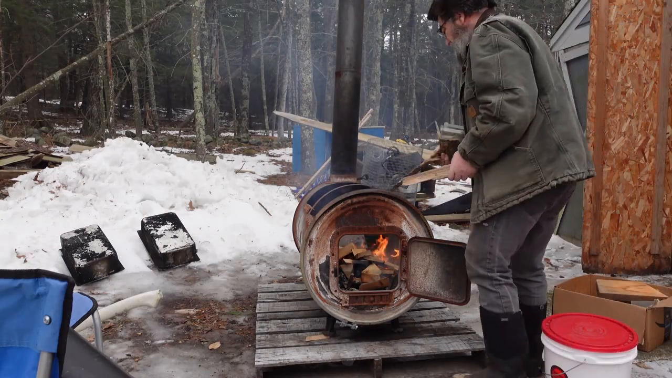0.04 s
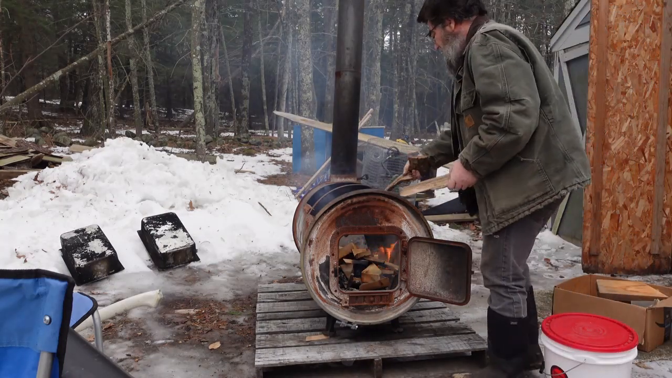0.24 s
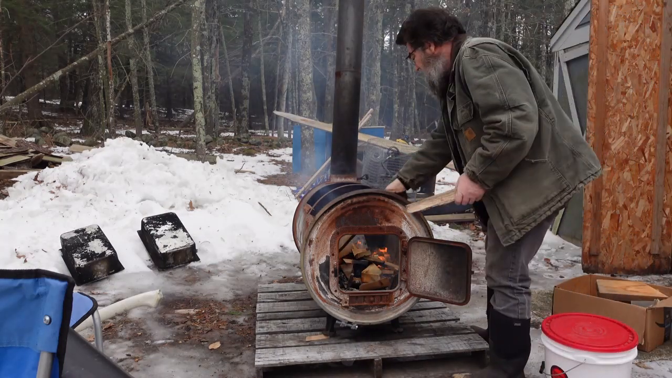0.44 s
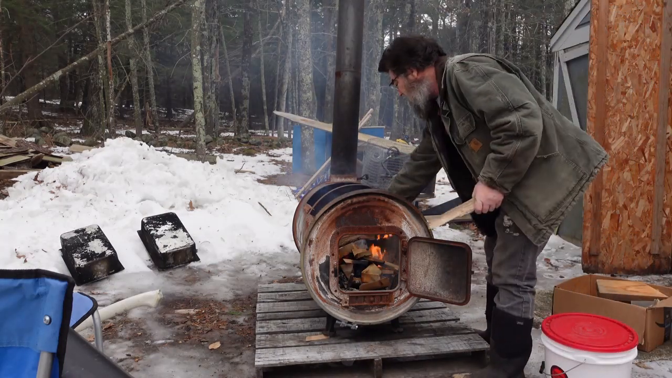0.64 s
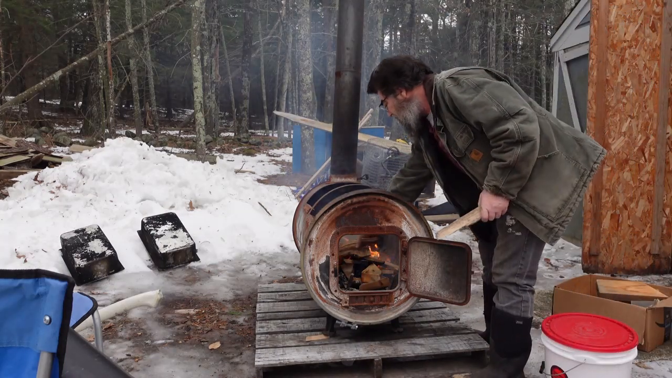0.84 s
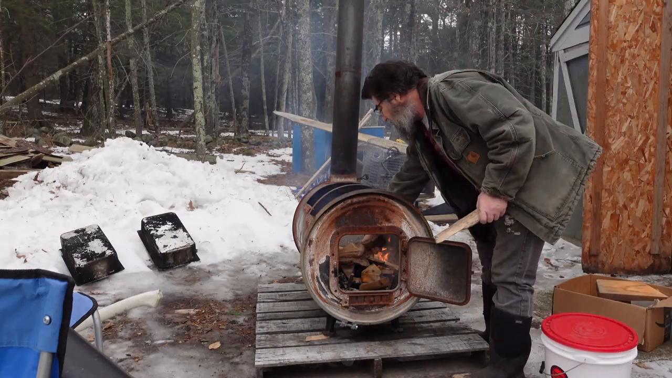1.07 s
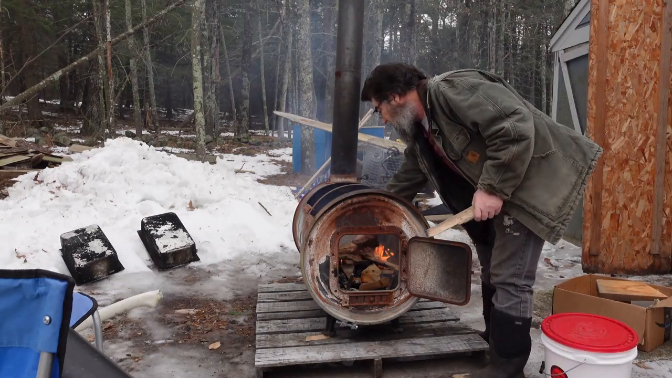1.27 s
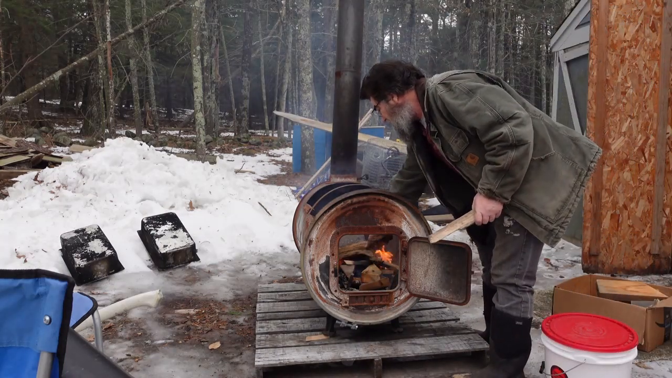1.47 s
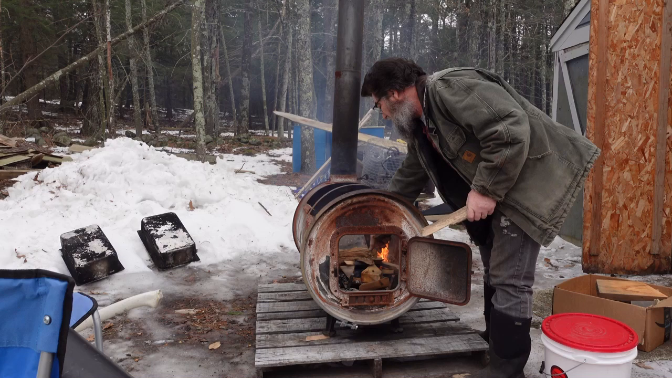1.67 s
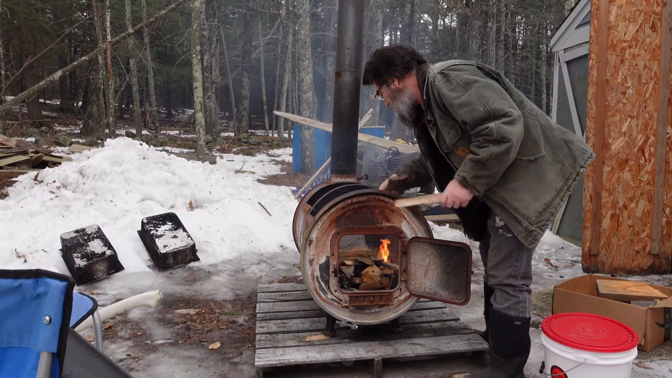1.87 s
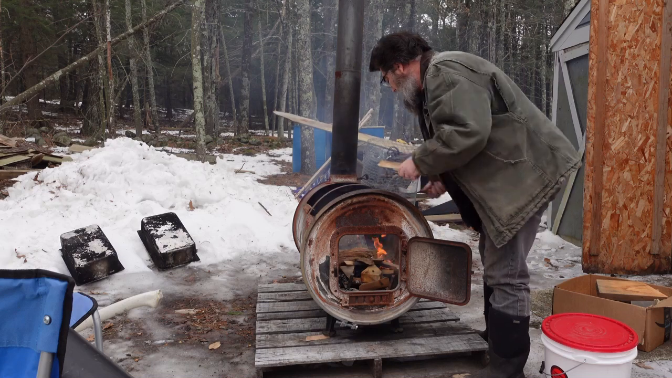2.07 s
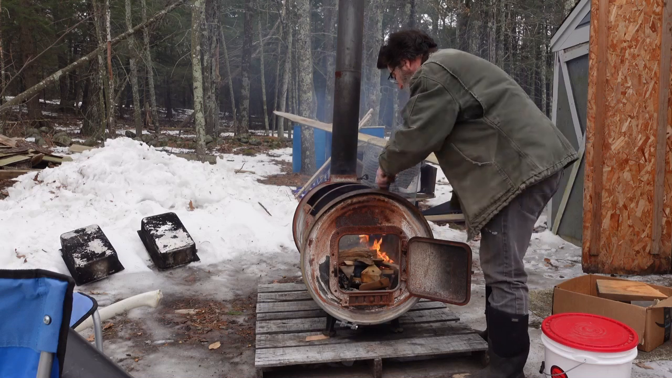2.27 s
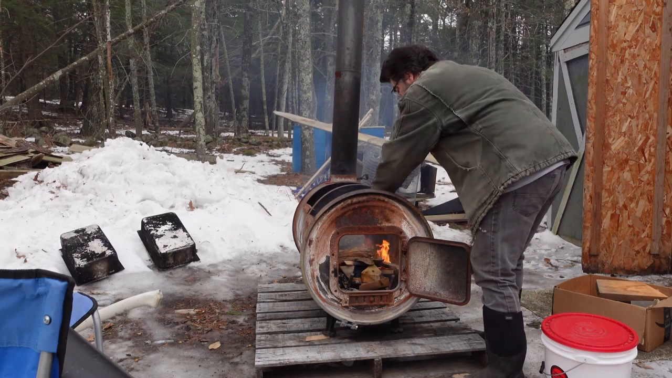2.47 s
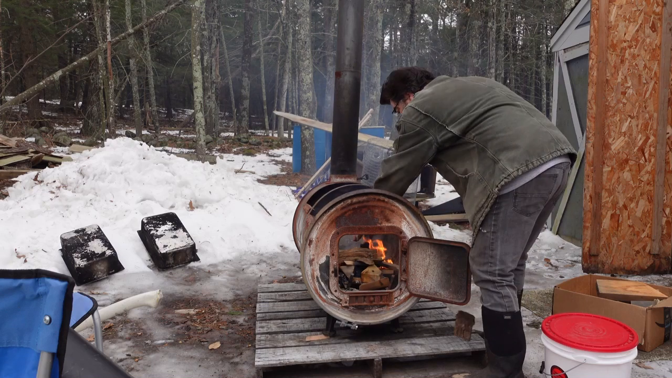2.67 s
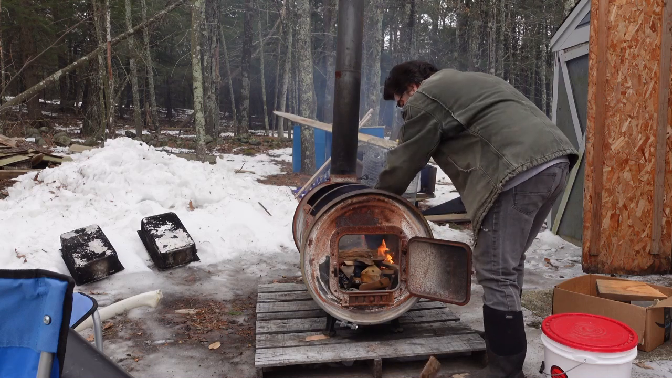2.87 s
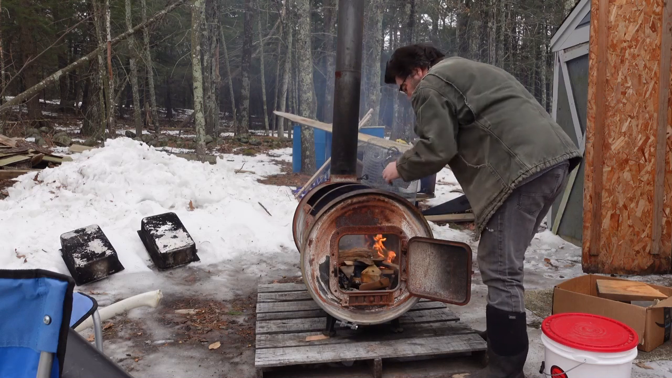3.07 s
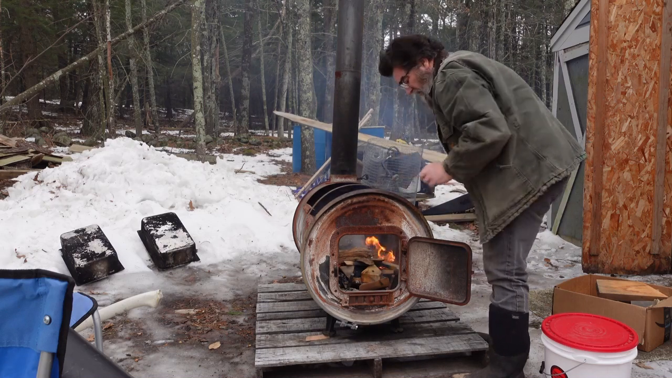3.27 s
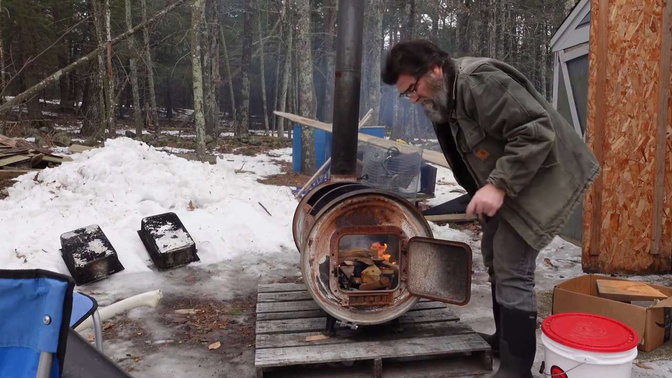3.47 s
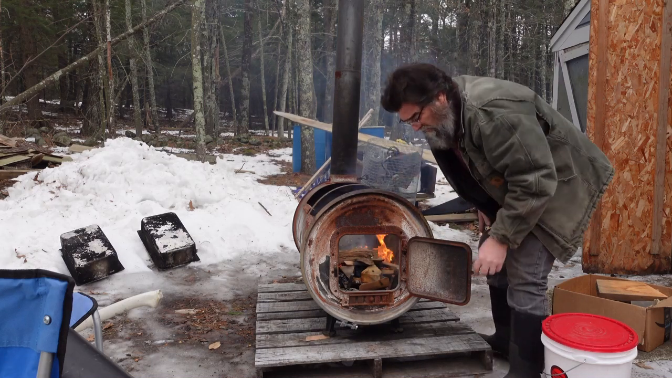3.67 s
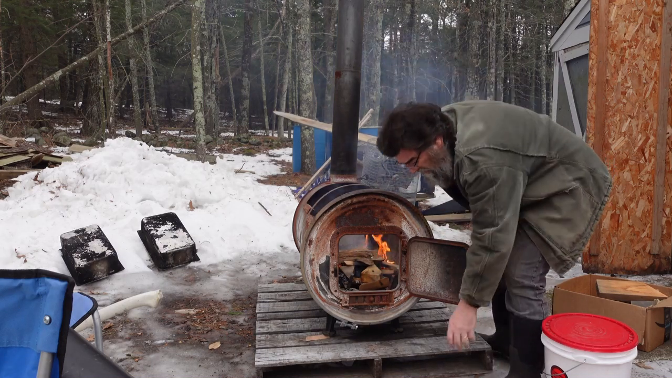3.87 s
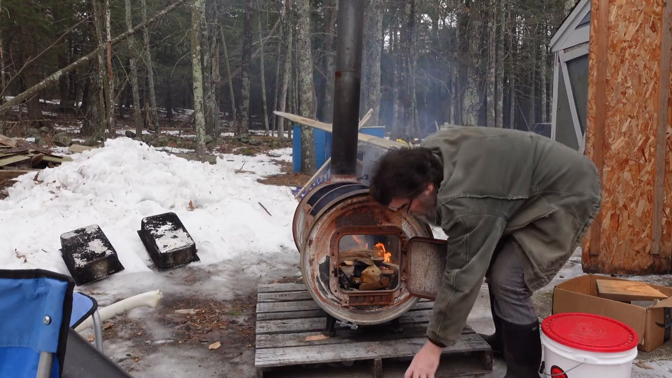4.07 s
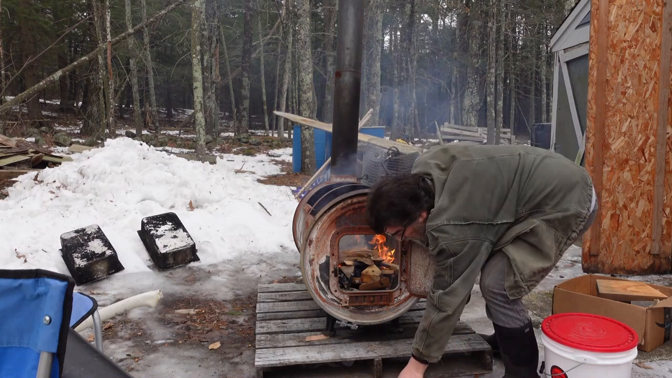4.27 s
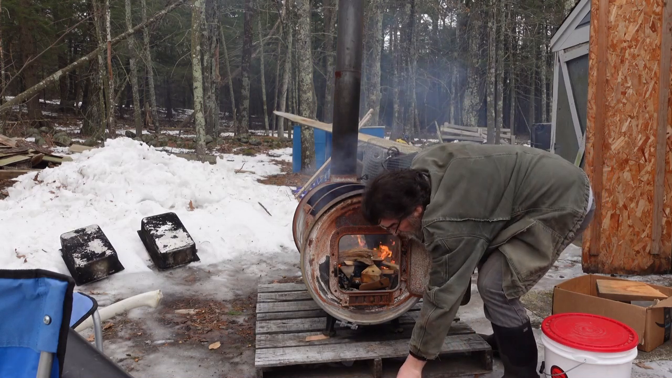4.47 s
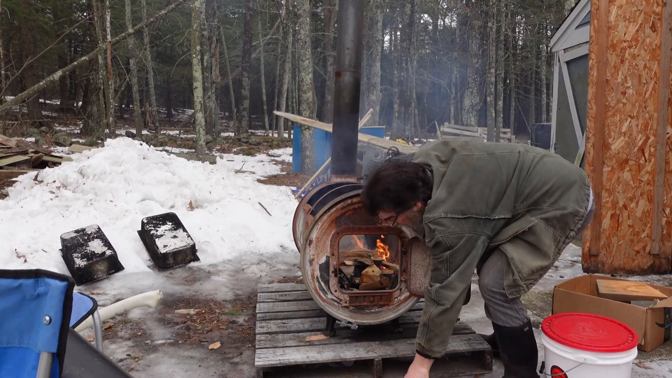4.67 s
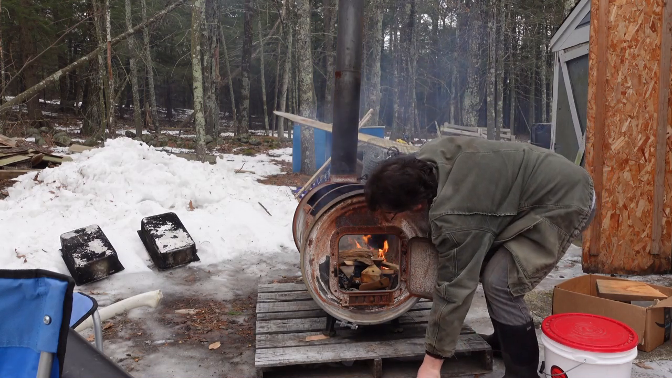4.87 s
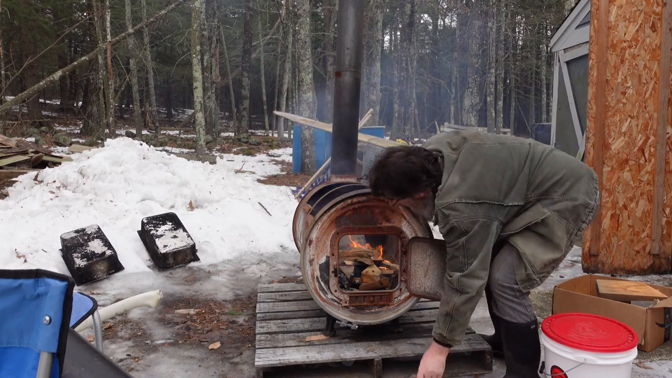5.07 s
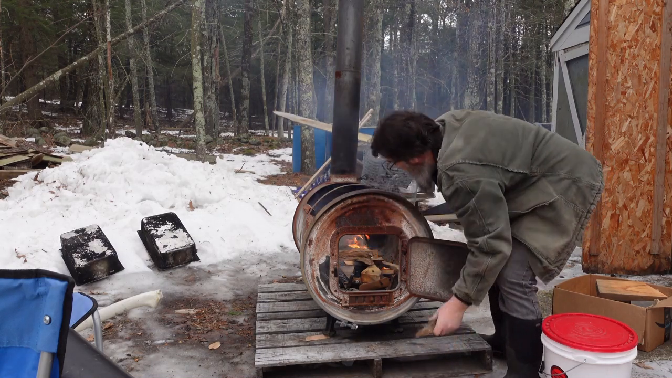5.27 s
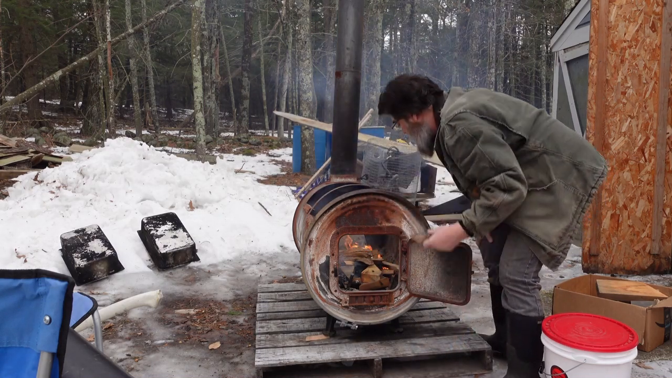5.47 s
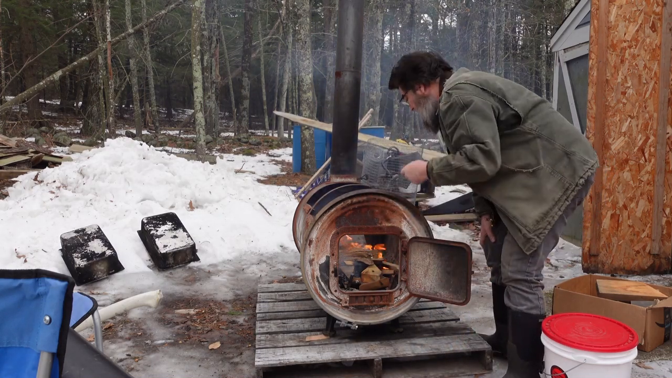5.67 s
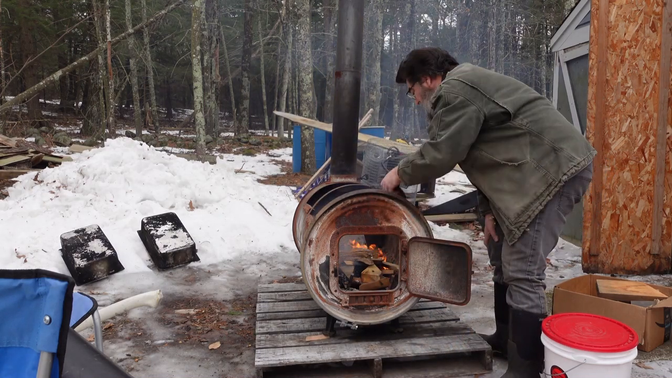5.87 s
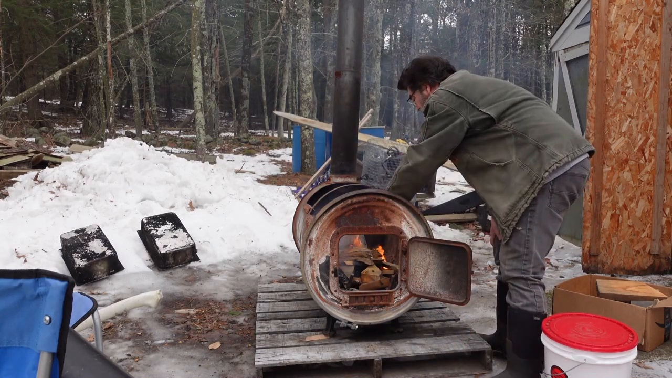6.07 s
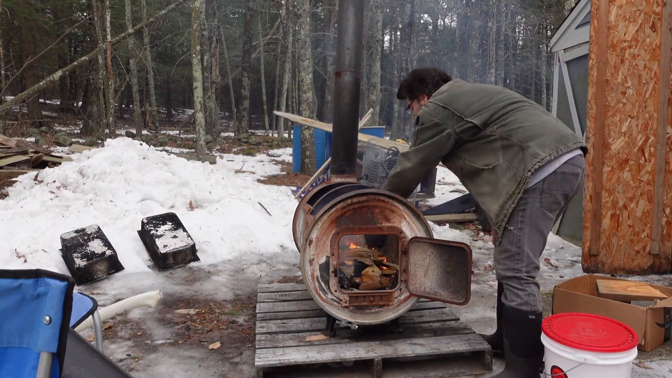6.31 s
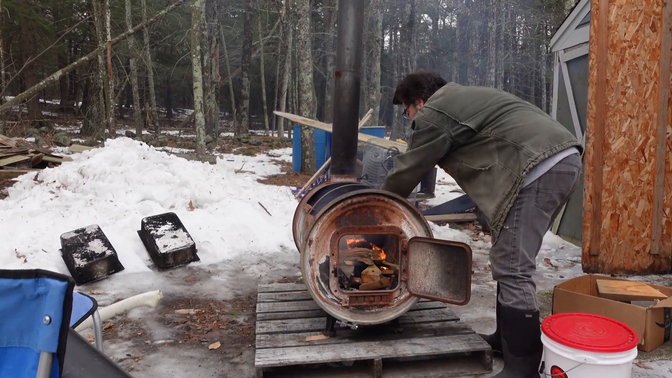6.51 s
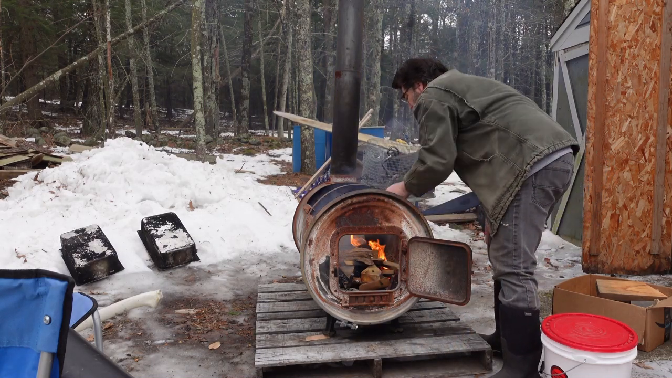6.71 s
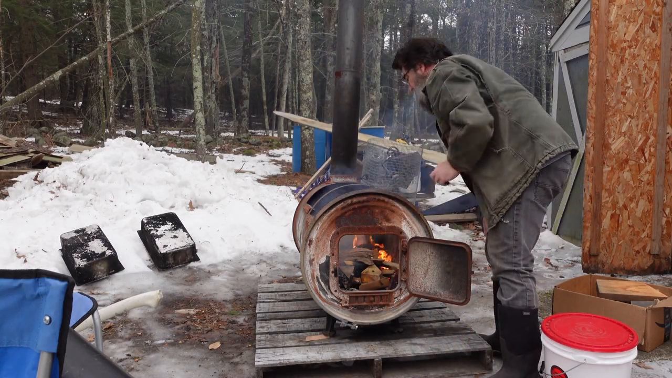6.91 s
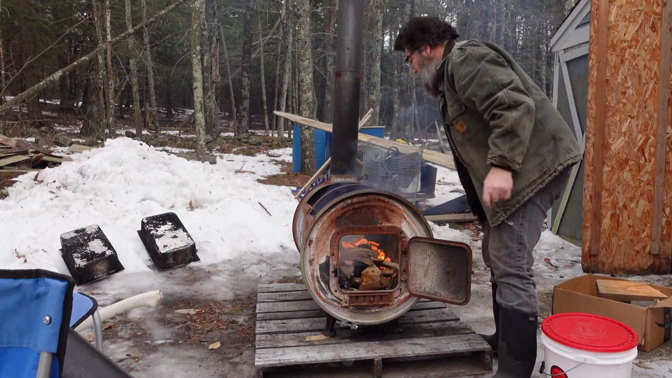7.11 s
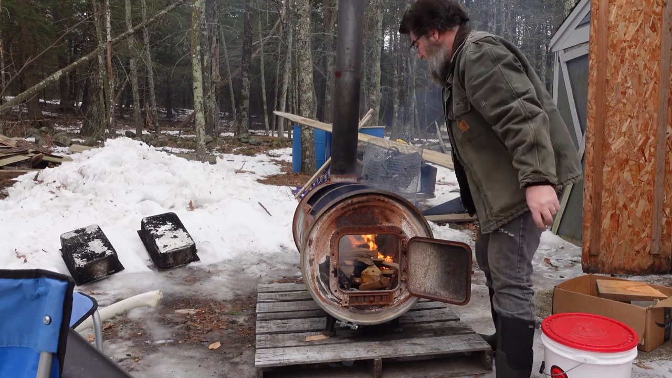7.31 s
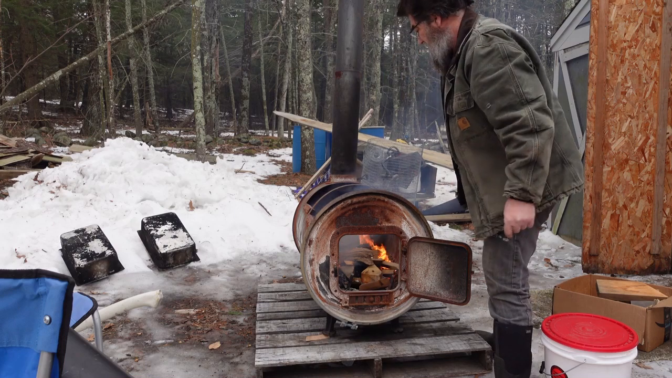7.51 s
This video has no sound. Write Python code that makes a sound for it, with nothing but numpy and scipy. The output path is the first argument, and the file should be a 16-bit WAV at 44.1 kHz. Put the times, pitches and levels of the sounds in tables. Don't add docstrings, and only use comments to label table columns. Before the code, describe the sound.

A soft, steady, airy fire roar lies under everything, outdoors among trees, with a short faint echo from a shed wall. From 0.1 s small wood ticks and scuffs, then knocks at 0.4-0.5 s with a light metallic ring. A firm set-down at 0.75 s thuds on the hollow drum, followed by gritty scraping along the sheet until about 1.7 s, with a dull knock and low thud at 1.33 s and a weak pan clank at 1.4 s. A faint low squeak and quiet rubbing follow. At 2.59 s a heavy, sharp drop starts the loudest passage: bright pan clangs around 2.8-2.9 s and clustered knocks to 3.3 s, quickly damped. Scuffs around 3.5 s give way to quieter rustling and sliding, a knock at 4.6 s, small snaps at 5-6 s, a moderate double knock at 6.5 s, then faint ticks and shuffling to about 7.5 s.

```python
import sys
import numpy as np
from scipy import signal
from scipy.fft import rfft, irfft
from scipy.io import wavfile
from scipy.ndimage import uniform_filter1d

SR = 44100
rng = np.random.default_rng(int(sys.argv[2]) if len(sys.argv) > 2 else 0)


def persist_wave(psi):
    counts = np.round(np.clip(psi, -1, 1) * 32767).astype(np.int16)
    wavfile.write(sys.argv[1], SR, np.atleast_2d(counts).T)


def field_ratio(decibels):
    return 10 ** (np.asarray(decibels, dtype=float) / 20)


N = 332822

# [f/Hz, level/dB per Hz]
AIR_SPECTRUM = [(15, -65), (25, -45.5), (124, -15.5), (220, -14.5), (854, -4), (1510, -0.5), (1830, -4),
                (2210, -2.5), (3600, -11), (5880, -12), (13600, -22), (15200, -22.5), (16500, -41.5)]
# [f/Hz, likeness 0 to 1]
AIR_LIKENESS = [(60, 1), (180, 0.75), (550, 0.29), (1650, 0.532), (4970, 0.107), (15000, 0.57)]

# [t/s, length/s, level/dB, hardness/dB per octave]
STROKES = [(0.096, 0.32, -48.5, -2), (0.414, 0.18, -49, -7), (.5, 0.32, -63.5, -9), (0.739, 0.3, -33, 1.5),
           (1.007, 0.69, -34, 1.5), (1.567, 0.282, -51.5, -4), (1.742, 1, -47, 0.5), (2.622, 0.127, -37, 3),
           (2.74, 0.13, -38.5, -6.5), (2.84, 0.35, -49, -8.5), (3.083, 0.36, -44.5, -7.5),
           (3.297, 1, -40.5, 0.5), (4.055, 0.87, -43.5, 0.5), (4.508, 0.19, -48.5, 13), (4.7, 0.47, -49, 2),
           (5.157, 0.54, -48.5, 1.5), (5.655, 0.68, -52, 0), (6.47, 0.64, -42.5, 0.5),
           (7.083, 0.74, -61, -5)]
# [low f/Hz, high f/Hz]
RUB_BANDS = [(1800, 7560), (440, 1830), (5000, 26400)]
# [distance from the middle part/octaves, level/dB]
RUB_SHADES = [(-0.5, -1.5), (-2.5, -2.5), (2, -7)]
# [f/Hz, width/Hz, level/dB]
RUB_BODY = [(900, 54, -45), (2640, 27, -12), (3830, 140, -53), (7430, 450, -17)]
# [middle t/s, length/s, level/dB, centre f/Hz, width/octaves]
SCUFFS = [(0.187, 0.095, -48, 2330, 1.5), (0.278, 0.0656, -44.5, 2160, 1.64),
          (0.767, 0.033, -38, 5730, 1.1), (.805, .02, -44, 6500, 0.57), (0.822, .016, -46.5, 6500, 1.05),
          (.862, 0.015, -42, 4300, 1), (0.918, .014, -42, 6800, 0.37), (0.938, 0.0105, -40, 7000, 0.46),
          (0.915, 0.053, -38, 4940, 2.6), (1.137, 0.26, -41, 4310, 1.6), (1.359, 0.12, -36, 5020, 1.86),
          (1.68, 0.104, -43.5, 3660, 2.1), (2.298, 0.082, -56.5, 6000, 2.7), (2.692, 0.012, -34, 6240, 0.8),
          (2.676, .012, -41, 5300, 0.5), (3.258, 0.099, -35.5, 1800, 2), (3.467, 0.0276, -41.5, 2570, 0.73),
          (3.522, 0.11, -34.5, 2450, 1.27), (3.632, 0.051, -43, 1880, 2.4), (3.653, 0.11, -47, 1310, 1.3),
          (0.269, 0.05, -44, 2080, 0.48), (3.72, 0.19, -48.5, 3460, 1.7), (4.236, 0.048, -52, 6500, 2.5),
          (4.561, 0.14, -38.5, 2700, 2.04), (4.565, 0.5, -50.5, 1460, 0.88), (4.635, 0.057, -36, 5000, 4.2),
          (5.946, 0.033, -47.5, 13740, 0.2), (6.075, 0.172, -56, 3170, 1.46),
          (6.773, 0.14, -49.5, 2223, 0.94), (2.028, 0.39, -57, 1140, 0.65), (3.978, 0.18, -53, 1384, 0.107),
          (3.903, 0.136, -59, 1520, .12), (7.344, 0.079, -57.5, 2040, 0.86), (7.51, 0.11, -58.5, 2500, 2.6)]

# [t/s, blow level/dB, note f/Hz, ring t60/s, tick level/dB]
KNOCKS = [(0.137, -31.5, 1314, 0.005, -30), (0.185, -38.5, 1690, 0.03, -29.5),
          (0.259, -38, 1840, 0.04, -66), (0.427, -28.5, 790, 0.008, -58), (0.488, -25, 1282, 0.079, -27),
          (0.922, -38, 2750, 0.02, -29), (1.331, -21.5, 905, 0.018, -20.5), (1.672, -33, 763, 0.032, -27.5),
          (2.588, -13, 2014, 0.042, -44.5), (2.858, -9.5, 2010, 0.017, -13),
          (2.979, -12.5, 1200, 0.0236, -58), (3.126, -20.5, 1870, 0.012, -30),
          (3.146, -15, 838.5, 0.037, -28), (3.157, -22.5, 1170, 0.023, -42),
          (3.265, -17, 1650, 0.0087, -52), (4.622, -25, 3013, 0.013, -18.5),
          (5.502, -30.5, 2014, 0.0045, -31.5), (6.537, -18.5, 900, 0.028, -30.5)]
# [t/s, blow level/dB, note f/Hz, tick level/dB]
SNAPS = [(0.109, -64, 1140, -38.5), (0.695, -42, 1250, -33), (1.62, -29, 1700, -44.5),
         (1.628, -29.5, 3150, -54), (1.771, -55.5, 1470, -33.5), (3.471, -29.5, 2214, -54),
         (4.325, -32.5, 1240, -60), (4.547, -32, 2340, -29), (4.575, -36, 3730, -33),
         (4.93, -39.5, 1800, -45), (5.032, -41, 1000, -41), (5.436, -40.5, 2600, -47.5),
         (5.941, -49, 4440, -46), (5.999, -33.5, 2920, -51), (6.507, -31.5, 2040, -25),
         (6.939, -38, 2380, -58), (6.982, -32.5, 3440, -50), (7.153, -42, 3600, -47),
         (7.229, -35, 880, -43)]
# [t/s, level/dB, f/Hz]
TAPS = [(0.431, -33, 1960), (.759, -24.5, 574), (2.588, -6.5, 5000), (2.5879, -10, 3280),
        (2.588, -12, 12300), (2.858, -14, 2000), (2.858, -19, 12900), (2.9798, -13.5, 860),
        (3.032, -21, 1127), (3.039, -22, 1070), (3.126, -13, 1040), (3.125, -11, 1769),
        (3.1465, -17.5, 645), (3.1517, -19, 1136), (3.158, -11, 1733), (3.162, -14, 900),
        (3.168, -16, 1210), (3.171, -22, 970), (4.325, -38.5, 900), (4.622, -28, 1220), (6.506, -20, 14100),
        (6.541, -22.5, 787), (7.2298, -35.5, 650), (7.233, -34, 2660)]
# [t/s, level/dB, f/Hz, ring t60/s]
CHIMES = [(.491, -33, 2140, 0.2), (.494, -21, 2200, 0.07), (.494, -26, 3880, 0.04),
          (0.491, -29, 5310, 0.058), (.492, -22, 1320, .09), (.497, -21, 1147, 0.054),
          (0.754, -27, 1250, 0.057), (.803, -37, 1960, 0.27), (1.095, -41.5, 883, 0.17),
          (1.338, -23.5, 1490, 0.047), (1.345, -23.5, 796, 0.049), (1.386, -33.5, 2930, 0.096),
          (1.645, -41, 3250, 0.22), (3.156, -23, 3370, 0.051), (3.1571, -8.5, 1090, 0.0082),
          (5.946, -41.5, 5320, 0.04), (2.863, -22, 3880, .04), (4.223, -50, 6050, .12),
          (4.223, -52, 7070, .1), (4.547, -38, 6300, .03), (4.621, -30, 1900, .03), (4.622, -36, 7300, .03),
          (6.508, -40, 5100, .03), (6.508, -40, 3200, .03), (6.512, -40, 1480, .12),
          (6.538, -40, 4300, .04), (6.572, -43, 3200, .06), (6.61, -47, 3200, .06), (2.679, -28, 2350, .05)]

# [t/s, blow level/dB, hardness/dB per octave, rise/s]
THUDS = [
    (0.4269, -33.5, 0.5, 0.00086),
    (0.7553, -24.5, -1, 0.0013),
    (1.328, -24, -0.5, 0.003),
    (2.587, -8, 1.5, 0.0076),
    (6.508, -34.5, -2.5, 0.001),
    (6.539, -36, 2, .003),
]
# [f/Hz, level/dB per Hz]
SHELL_SPECTRUM = [(88, -38), (150, -18), (551, -4), (615, -11), (1030, -2.5), (1660, -10.5), (2180, -6.5),
                  (12000, -43), (15600, -75), (22000, -120)]
# [f/Hz, t60/s]
SHELL_RING = [(200, 0.81), (500, 0.46), (1500, 0.28), (3000, 0.49), (6000, 0.28), (12000, 0.0096)]
# [t/s, level/dB, f/Hz, t60/s]
DRUM_NOTES = [(.43, -49.5, 353, 1), (.43, -47.5, 542, 1), (.5, -46, 548, .5), (.759, -42.5, 129, .62),
              (.945, -44, 478, .2), (1.151, -51, 480, .3), (1.334, -48, 147, .6), (1.35, -50, 87, .74),
              (1.701, -57, 124, .37), (2.599, -39, 303, .3), (2.601, -45, 136, .51), (2.8, -29, 480, .11),
              (2.982, -32.5, 398, .12), (3.316, -39, 535, .18), (6.56, -52, 228, .6), (6.54, -49, 130, .4),
              (7.05, -76, 122, 1.5), (6.85, -72, 126, 1.5), (7.29, -73, 124, 1.2), (2.858, -48, 90, .07),
              (2.979, -50, 90, .07)]
# [t/s, length/s, level/dB, from f/Hz, to f/Hz]
FLEX = (1.352, .052, -38, 340, 110)

# [t/s, blow level/dB, hardness/dB per octave, damping factor]
CLANGS = [(0.458, -40, -3, 0.68), (0.64, -40, -8, 0.95), (1.4188, -29, -5, 1.1), (2.763, -11, 1.5, 1.43),
          (2.8077, -30, 3.5, 2), (2.8573, -15, 1, 1.3), (2.8767, -2.5, 0.5, 1.75), (2.986, -13, -3, 1.83),
          (3.0902, -22.5, -4.5, 1.53), (3.206, -20.5, -4, 1.96), (3.313, -18, -1.5, 1.7)]
# [f/Hz, level/dB, t60/s]
PAN_MODES = [(486, -13, 0.36), (1477, -8, 0.3), (1982, -9, 0.56), (2175, -9, 0.37), (2552, 1, 0.18),
             (2990, -11, 0.25), (3316, -2, 0.17), (4176, -6, 0.11), (4312, -12, 0.11), (5040, -17, 0.25),
             (4780, -17.5, 0.33), (5660, -15, 0.16), (6840, -22, .13), (7500, -25, 0.15)]
# [t/s, stop t/s, level/dB]
HUMS = [(0.531, 0.636, -37.5), (0.639, 0.75, -50), (0.757, 0.907, -38), (1.36, 1.41, -45),
        (1.442, 1.498, -41.5), (1.499, 1.575, -50), (2.76, 2.865, -30.5), (2.868, 2.975, -24),
        (2.968, 3.157, -26.5), (3.211, 3.24, -39), (3.313, 3.442, -34), (3.437, 3.547, -49)]

# [t/s, level/dB, tick level/dB, rise/s]
BLOWS = [
    (.7555, -31.5, -45, .004),
    (1.333, -26, -45, 0.0056),
    (2.588, -19.5, -14, 0.0032),
    (2.8074, -28.5, -40, .001),
    (6.539, -35.5, -45, 0.0022),
]
# [f/Hz, level/dB, t60/s]
BLOW_MODES = [
    [(476, 0, 0.58), (544, -34, 5.0), (684, -13, 0.66), (747.6, -20, 1.2), (856, -3, 0.218),
     (894, -39, 5.0), (1082, -25, 5.0), (1120, -21, 2.0), (1244, -16, 1.4), (1420, -31.5, 5.0)],
    [(210, -25, 0.155), (403, 1.5, 0.18), (513, -1.5, 0.19), (650, -1.5, 0.23), (716, -14, 0.33),
     (790, 0, 0.09), (941, -11, 0.23), (1039, -21.5, 0.39), (1080, -9.5, 0.25), (1206, -21, 0.92),
     (1234, -24, 5.0), (1440, -6, 0.041)],
    [(463, -24, 5.0), (557, -12, 0.108), (851, -11, 5.0), (1058, -7.5, 0.55), (1510, -0.5, 0.21),
     (1850, 0, 0.11), (2176, -8, 0.63), (2300, -10, 0.3), (2800, -25, 5.0), (3020, -18.5, 0.355),
     (3795, -22, 0.3), (4040, -13, 0.29), (4258, -46, 4.3), (4996, -39, 5.0)],
    [(2536, -12, 0.04), (3015, -12, 0.095), (3774, -23, 0.2), (4307, -17, 0.1), (4780, -23, 0.2),
     (5044, -19, 0.15), (5383, -25, 0.14), (5658, -35, 5.0), (6000, -15, 0.18), (6837, -15, 0.085),
     (7063, -32, 0.36), (7330, -12, 0.11), (7500, -1, 0.02), (8296, -20, 0.14)],
    [(385.2, -6.5, 0.18), (420, -6, 0.083), (508, -10, 0.24), (663, -3, 0.087), (825, -6, 0.37),
     (940, -16.5, 0.26), (1090, -21, 0.21), (1174, -18, 0.06), (1283, -26, 1.1), (1450, -13.5, 0.26)],
]

# [t/s, length/s, level/dB, slip rate f/Hz, share of sag]
SQUEAKS = [
    (1.768, 0.27, -50, 723.6, 0.0095),
    (4.36, 0.15, -54.5, 1646, .035),
]
# [f/Hz, width/Hz, level/dB]
SQUEAK_BODY = [
    [(790, 220, -10.5), (1457, 97, 1.5), (2140, 60, -27)],
    [(3270, 150, -10), (1770, 610, -40)],
]
SQUEAK_ROUGH = [1.4, .3]

# [f/Hz, t60/s]
YARD_RING = [(200, 0.64), (1000, 0.28), (4000, 0.293), (12000, 0.33)]


def evened(x):
    return x / np.sqrt(np.mean(x ** 2) + 1e-20)


def peaked(x):
    return x / (abs(x).max() + 1e-20)


def read(points, hz):
    f, value = np.transpose(points)
    return np.interp(np.log(hz + 1), np.log(f + 1), value)


def add(mix, s, sound):
    part = mix[round(s * SR):][:len(sound)]
    part += sound[:len(part)]


def band(x, lo_hz, hi_hz, order=2):
    sos = signal.butter(order, [lo_hz, min(hi_hz, SR / 2.2)], "band", fs=SR, output="sos")
    return signal.sosfilt(sos, x)


def resonate(x, hz, width):
    turn = np.exp(2j * np.pi * np.cumsum(hz * np.ones(len(x))) / SR)
    r = np.exp(-np.pi * abs(width) / SR)
    return 2 * (turn * signal.lfilter([1 - r], [1, -r], x / turn)).real


def rings(hz, t60, t):
    return field_ratio(-60 * t / t60[:, None]) * np.sin(2 * np.pi * hz[:, None] * t)


def arch(u, skew):
    return np.sin(np.pi * np.clip(u, 0, 1) ** skew) ** 2


def contact(seconds, noise):
    u = np.arange(len(noise)) / SR / max(seconds, 3e-4)
    return noise * np.exp(-u) * (1 - np.exp(-u / 0.46))


def grit(count, per_s):
    clump = field_ratio(2.42 * evened(uniform_filter1d(rng.standard_normal(count), 300)))
    size = field_ratio(1.76 * np.minimum(rng.exponential(1, count), 4))
    grains = rng.standard_normal(count) * size * (rng.random(count) < per_s / SR)
    return evened(grains * clump) + 0.72 * rng.standard_normal(count)


def air():
    frames, hz = N // 256 + 5, np.fft.rfftfreq(1024, 1 / SR)
    a, b, c, d, patches = rng.standard_normal((frames, 513, 5)).T
    patches = evened(uniform_filter1d(uniform_filter1d(patches, 10, 0), 14, 1))
    same = np.clip(read(AIR_LIKENESS, hz), -1, 1)[:, None]
    left = a + 1j * b
    right = same * left + np.sqrt(1 - same ** 2) * (c + 1j * d)
    z = np.array([left, right]) * field_ratio(read(AIR_SPECTRUM, hz)[:, None] + 0.48 * patches)
    roar = signal.istft(z, nperseg=1024, noverlap=768)[1][:, :N]
    return field_ratio(-57.5) * evened(roar)


def rubbing():
    t, drive = np.arange(N) / SR, grit(N, 5000)
    drive = drive + 0.85 * sum(field_ratio(db) * resonate(drive, hz, width) for hz, width, db in RUB_BODY)
    start, length, db, hard_db = np.transpose(STROKES)[:, :, None]
    power = arch((t - start) / length, 0.869) ** 0.738
    out = np.zeros(N)
    for edge, (octaves, shade_db) in zip(RUB_BANDS, RUB_SHADES):
        backward = band(drive, *edge, order=1)[::-1]
        shade = band(backward, *edge, order=1)[::-1]
        stroke_power = power * field_ratio(2 * (db + hard_db * octaves + shade_db - 13.5))
        out += np.sqrt(stroke_power.sum(axis=0)) * evened(shade)
    return out


def knocks():
    hits = KNOCKS + [(s, db, hz, 0.014, tick_db) for s, db, hz, tick_db in SNAPS]
    out, t_count = np.zeros(N), 4096
    faces = rng.standard_normal((len(hits), 2, t_count))
    for (s, db, hz, t60, tick_db), face in zip(hits, faces):
        touch_s = 0.0024 * field_ratio(0.2965 * (db + 46.5))
        hit = contact(touch_s, face[0])
        width = 1.04 / max(t60, .004)
        note = resonate(hit, hz, width) + 0.2 * resonate(hit, 1.9 * hz, 0.5 * width)
        body = peaked(note) + 1.436 * peaked(band(hit, 0.3 * hz, 1.8 * hz))
        tick = band(contact(0.55 * touch_s, face[1]), 3800, 8600)
        add(out, s, field_ratio(db - 1.5) * peaked(body) + field_ratio(tick_db - 2.5) * peaked(tick))
    return out


def scuffs():
    out, drive = np.zeros(N), grit(N, 5000)
    spots = rng.standard_normal((len(SCUFFS), 600)) * field_ratio(-60 * np.arange(600) / SR / 0.074)
    for (s, length, db, hz, octaves), spot in zip(SCUFFS, spots):
        start, count = s - length / 2, round(length * SR)
        grains = drive[round(start * SR):][:count]
        rung = evened(signal.fftconvolve(grains, spot)[:len(grains)]) + 1.2 * evened(grains)
        burst = band(rung, hz / 2 ** (octaves / 2), hz * 2 ** (octaves / 2))
        add(out, start, field_ratio(db) * evened(burst) * signal.windows.tukey(len(burst), .85))
    return out


def drum_thuds():
    out, t = np.zeros(N), np.arange(SR // 2) / SR
    hz = np.fft.rfftfreq(len(t), 1 / SR)
    centres = np.geomspace(180, 11000, num=9)
    parts = np.exp(-(np.log(hz + 1) - np.log(centres)[:, None]) ** 2 / 0.77)
    parts /= parts.sum(axis=0) + 1e-9
    decay = field_ratio(-57 * t / read(SHELL_RING, centres)[:, None])
    rattles = rng.standard_normal((len(THUDS), 2, len(t)))
    for (s, db, hard_db, rise), (rattle, chatter) in zip(THUDS, rattles):
        colour = field_ratio(read(SHELL_SPECTRUM, hz) + hard_db * np.log2(hz / 1000 + 0.034))
        bands = irfft(rfft(rattle) * colour * parts, len(t))
        rise_s = max(rise, 2e-4) * (1000 / centres[:, None]) ** 1.08
        ring = (bands * (1 - np.exp(-t / rise_s)) * decay).sum(axis=0)
        flutter_db = 2.2 * evened(uniform_filter1d(chatter, 180))
        add(out, s, field_ratio(db + flutter_db) * peaked(ring))
    return out


def drum_notes():
    out, t = np.zeros(N), np.arange(SR // 2) / SR
    for s, db, hz, t60 in DRUM_NOTES:
        pair = np.sin(2 * np.pi * hz * t) + 0.843 * np.sin(2 * np.pi * 1.035 * hz * t)
        swell = 1 - np.exp(-t * hz / 3.2)
        add(out, s, field_ratio(db - 60 * t / t60) * pair * swell * np.cos(np.pi * t))
    return out


def taps():
    hits = CHIMES + [(s, db, hz, 0.014 * (1000 / hz) ** 0.64) for s, db, hz in TAPS]
    out, t = np.zeros(N), np.arange(4096) / SR
    for (s, db, hz, t60), grain in zip(hits, rng.standard_normal((len(hits), len(t)))):
        fibres = .35 * evened(band(grain, .6 * hz, 1.5 * hz))
        note = np.sin(2 * np.pi * hz * t) + fibres
        add(out, s, field_ratio(db) * peaked(field_ratio(-60 * t / t60) * note * (1 - np.exp(-t * hz / .5))))
    return out


def pan_clangs():
    out, t = np.zeros(N), np.arange(SR // 3) / SR
    hz, mode_db, t60 = np.transpose(PAN_MODES)
    modes = rings(hz, t60, t) + .35 * rings(hz * 1.011, t60 * .7, t)
    places = rng.standard_normal((len(CLANGS), len(hz)))
    faces = rng.standard_normal((len(CLANGS), len(t)))
    for (s, db, hard_db, damp), place, face in zip(CLANGS, places, faces):
        ring = field_ratio(mode_db + 1.5 * place + hard_db * np.log2(hz / 2500)) @ modes
        clank = peaked(ring) + .25 * peaked(band(contact(.012, face), 1200, 5500))
        damped = field_ratio(db - 286 * (damp - 1) * t)
        add(out, s, damped * clank * (1 - np.exp(-t / 0.0019)))
    return out


def pan_hums():
    out, t, hum_hz = np.zeros(N), np.arange(SR // 3) / SR, 1239
    for s, stop, db in HUMS:
        held = t[:round((stop - s) * SR)]
        tone = np.sin(2 * np.pi * hum_hz * (held + s))
        tone = tone + 0.118 * np.sin(2 * np.pi * 0.88 * hum_hz * held)
        add(out, s, field_ratio(db - 60 * held / 0.79) * tone * signal.windows.tukey(len(held), .15))
    return out


def blows():
    out, t = np.zeros(N), np.arange(SR // 3) / SR
    tick = peaked(band(np.exp(-t / .00008), 3000, 15000, order=1))
    for (s, db, tick_db, rise), modes in zip(BLOWS, BLOW_MODES):
        hz, mode_db, t60 = np.transpose(modes)
        rock = evened(uniform_filter1d(rng.standard_normal((len(hz), len(t))), 500, axis=1))
        ring = field_ratio(mode_db) @ (rings(hz, np.clip(t60, .01, .42), t) * field_ratio(4.0 * rock))
        swell = 1 - np.exp(-t / max(rise, 3e-4))
        fade = np.cos(1.5 * np.pi * t)
        add(out, s, field_ratio(db) * ring * swell * fade + field_ratio(tick_db) * tick)
    return out


def panel_flex():
    out = np.zeros(N)
    s, length, db, from_hz, to_hz = FLEX
    u = np.arange(0, 1, 1 / (length * SR))
    glide_hz = from_hz * (to_hz / from_hz) ** u
    add(out, s, field_ratio(db) * np.sin(np.pi * u) * np.sin(2 * np.pi * np.cumsum(glide_hz) / SR))
    return out


def squeaks():
    out = np.zeros(N)
    for (s, length, level_db, slip_hz, sag), body, rough in zip(SQUEAKS, SQUEAK_BODY, SQUEAK_ROUGH):
        t = np.arange(0, length, 1 / SR)
        wobble = evened(uniform_filter1d(rng.standard_normal(len(t)), 200))
        droop = 1 - sag * t / length
        rate_hz = slip_hz * droop * (1 + 0.056 * rough * wobble)
        slips = np.diff(np.floor(np.cumsum(rate_hz) / SR), prepend=0)
        drive = evened(slips) + 1.5 * rough * rng.standard_normal(len(t))
        tone = np.zeros(len(t))
        for hz, width, db in body:
            once = resonate(drive, hz * droop, width)
            tone += field_ratio(db) * resonate(once, hz * droop, width)
        add(out, s, field_ratio(level_db) * evened(tone) * np.sqrt(arch(t / length, 0.87)))
    return out


def yard(x):
    echoes = np.zeros((2, SR // 2))
    at = np.arange(200, SR // 2 - 20, 20) + rng.integers(0, 20, (2, (SR // 2 - 201) // 20))
    np.put_along_axis(echoes, at, rng.choice([-1., 1.], at.shape), 1)
    hz, t, z = signal.stft(echoes, SR, nperseg=256)
    tail = signal.istft(z * field_ratio(-60 * t / read(YARD_RING, hz)[:, None]), SR, nperseg=256)[1]
    return signal.fftconvolve(x[None], tail / np.linalg.norm(tail[0]), axes=1)[:, :N]


def scene():
    wood = knocks() + taps() + rubbing() + scuffs() + squeaks()
    wood_and_pan = band(wood + pan_clangs() + pan_hums(), 177, 8540)
    drum = drum_thuds() + panel_flex() + drum_notes()
    near = drum + wood_and_pan + blows()
    sides = field_ratio(np.array([[-.7], [.7]]))
    echoes = yard(band(near, 490, 19000, order=1))
    return near * sides + field_ratio(-12.0) * echoes + air()


def band_limit(x):
    return signal.sosfilt(signal.butter(12, 16820, fs=SR, output="sos"), x)


def record(dry):
    no_rumble = signal.sosfilt(signal.butter(2, 70, "high", fs=SR, output="sos"), dry)
    mix = signal.oaconvolve(no_rumble, signal.firwin(101, 16500, fs=SR)[None], "same")
    return band_limit(mix)


dry = scene()
out = record(dry)
persist_wave(out)
```